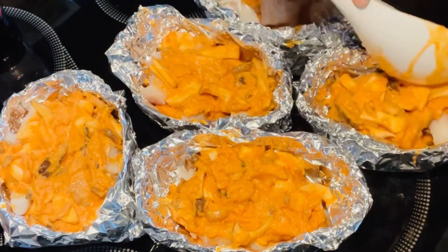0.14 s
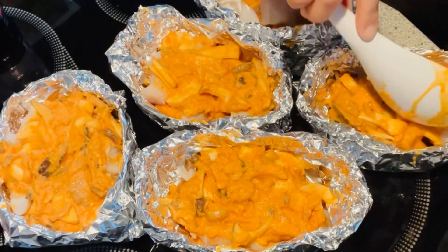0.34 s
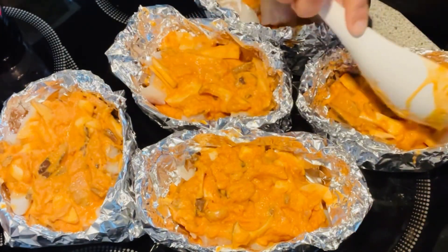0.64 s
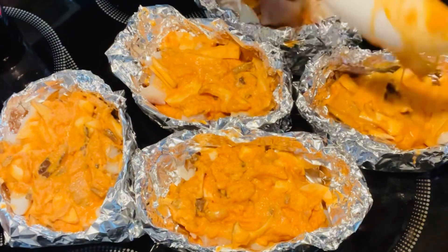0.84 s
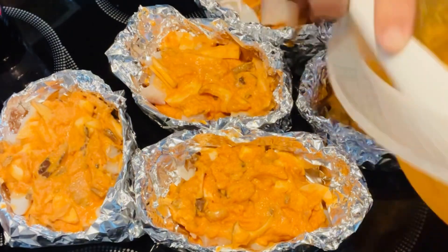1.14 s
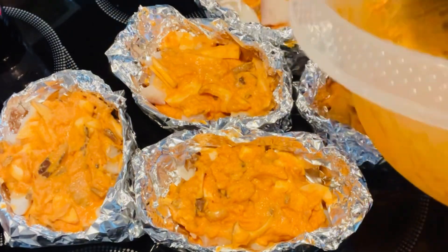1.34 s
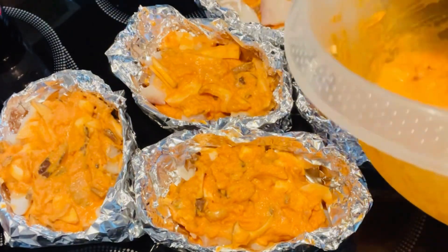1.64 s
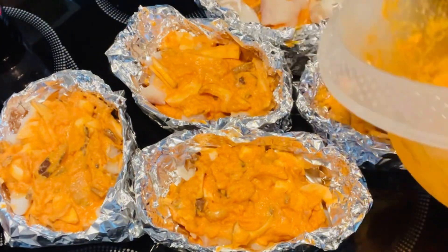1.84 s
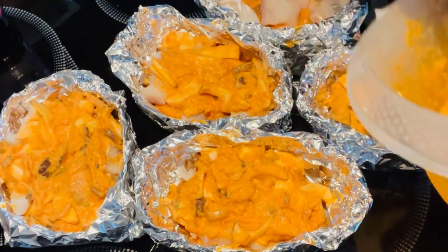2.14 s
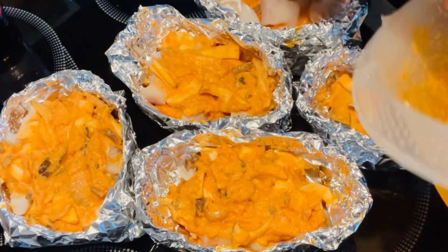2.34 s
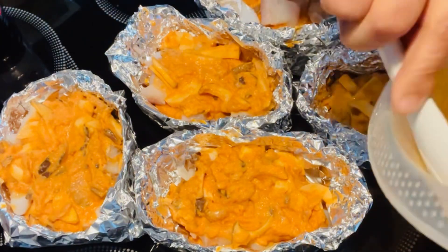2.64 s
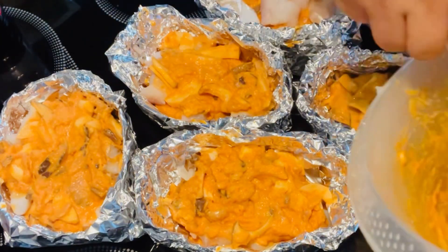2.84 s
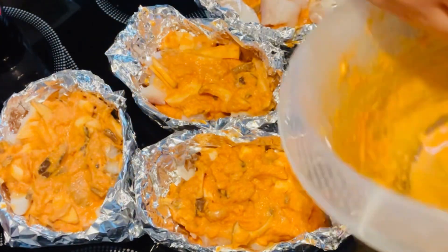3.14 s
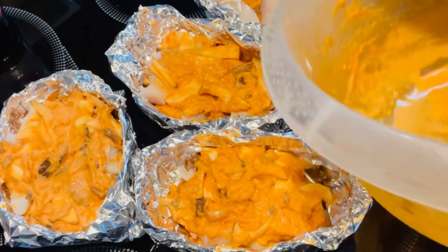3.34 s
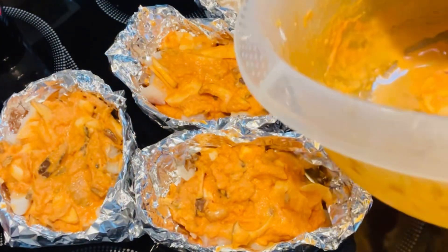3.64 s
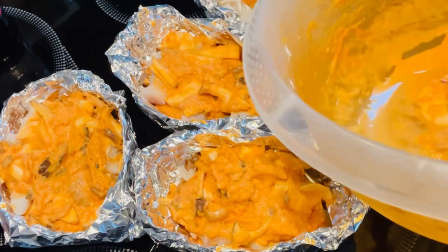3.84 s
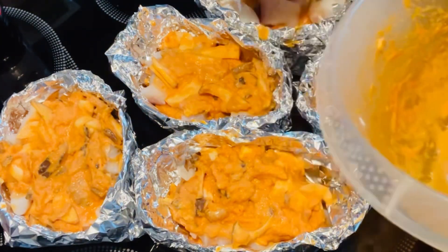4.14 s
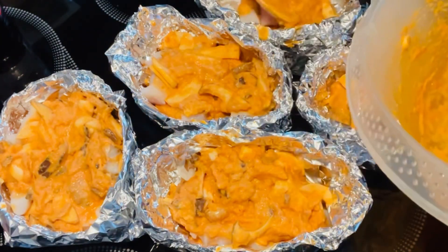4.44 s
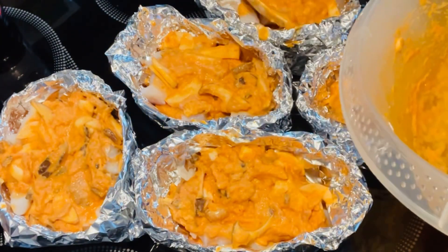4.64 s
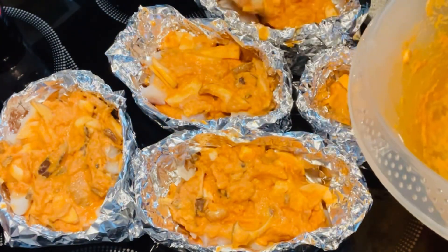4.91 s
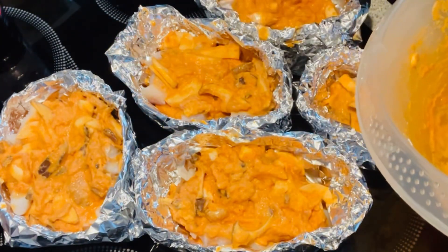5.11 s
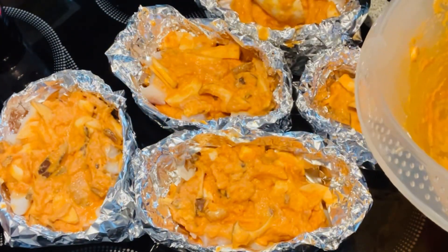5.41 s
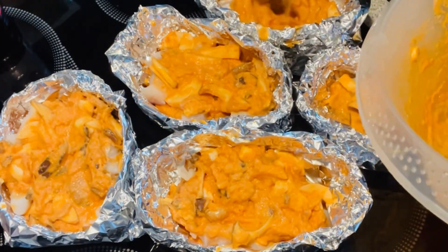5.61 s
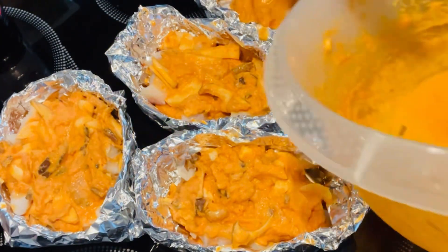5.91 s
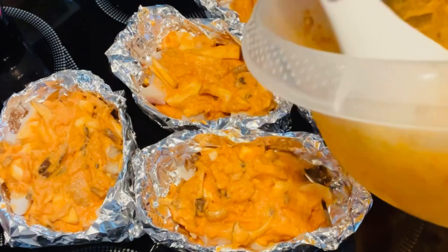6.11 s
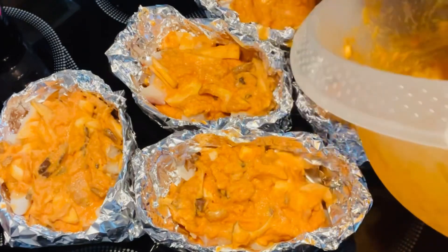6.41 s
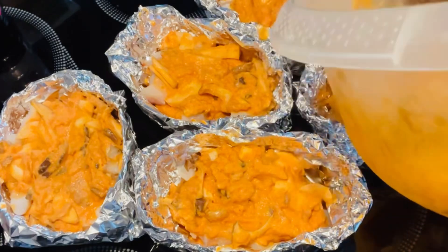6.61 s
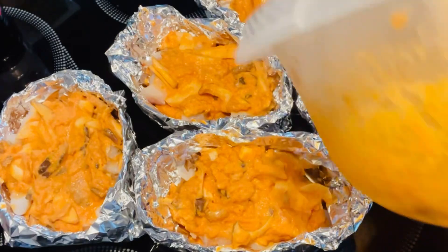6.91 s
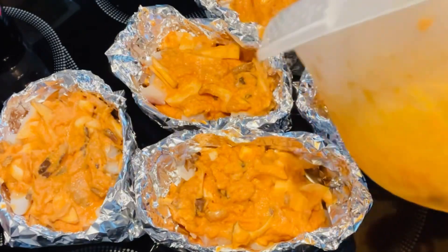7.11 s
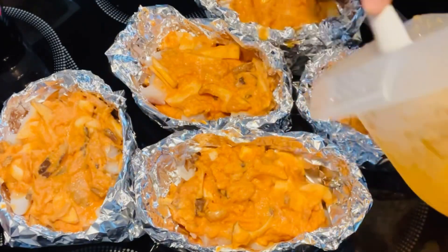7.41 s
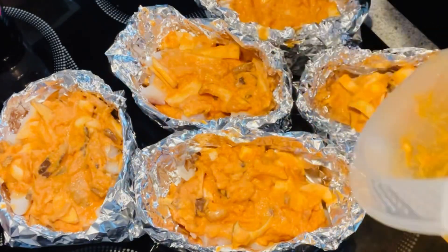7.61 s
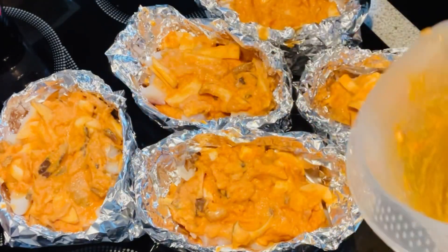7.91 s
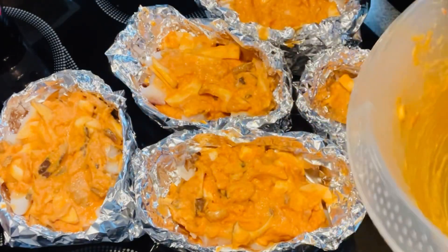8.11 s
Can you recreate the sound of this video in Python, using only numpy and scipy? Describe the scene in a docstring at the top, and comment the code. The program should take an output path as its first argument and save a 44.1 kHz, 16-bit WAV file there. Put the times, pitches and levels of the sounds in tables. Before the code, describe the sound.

A plastic spoon scoops thick sauce from a plastic bowl into foil cups, heard close in a small kitchen over a faint low appliance hum and soft hiss. The first second holds only light ticks and a faint scrape. At 1.2 seconds a dull thump comes with sharp foil snaps. Soft scrapes, short sauce plops and hollow bowl knocks follow until about 3.1 seconds, with strong hits at 2.0 and 2.4 and the loudest ringing knock at 2.7. A lull follows, with sparse small foil ticks near 4.1 and 5.3 seconds. At 6.1 a sharp snap and a thump restart the work, followed by more scrapes and plops. The bowl is knocked firmly at 7.0 and thumps heavily at 7.3. A soft scrape with a couple of crisp snaps runs until about 7.9, then fades into the hum.

```python
"""A small kitchen: a plastic spoon scoops thick sauce from a plastic mixing bowl into foil cups.
The spoon knocks the loaded bowl, which rings and thumps, and scrapes along it in tiny slips.
The sauce plops; sauce films break and foil creases flip with a tick. The room adds a short tail.
Underneath, an appliance hums with a slow beat over soft room noise."""
import sys
import numpy as np
from scipy import signal
from scipy.fft import rfft, irfft, next_fast_len
from scipy.io import wavfile
from scipy.ndimage import uniform_filter1d

SR = 44100
rng = np.random.default_rng(int(sys.argv[2]) if len(sys.argv) > 2 else 0)


def master(y):
    """Save y as 16-bit WAV."""
    cut = np.clip(np.atleast_2d(y).T, -1, 1)
    pcm = np.round(cut * 32767)  # scale
    wavfile.write(sys.argv[1], SR, pcm.astype(np.int16))


N = 364266
TIME_S = np.arange(N) / SR
AGE_S = TIME_S[:SR // 2]   # since contact


def from_db(db):
    """Decibels to gain."""
    return np.exp(np.asarray(db) * (np.log(10) / 20))


def unit_rms(x):
    """Scale to rms 1."""
    return x / np.sqrt(np.mean(x ** 2) + 1e-20)


def decay(t60_s):
    """Exponential decay from contact."""
    return np.exp(-np.log(1000) * AGE_S / max(t60_s, 1e-3))


def at_hz(points, hz):
    """Table lookup on a log-frequency axis."""
    freq_hz, value = np.transpose(points)
    return np.interp(np.log(np.maximum(hz, 1)), np.log(freq_hz), value)


def coloured(x, spectrum):
    """Spectral shaping; rms 1."""
    size = next_fast_len(len(x))
    gain = from_db(at_hz(spectrum, np.arange(size // 2 + 1) * SR / size))
    return unit_rms(irfft(rfft(x, size) * gain, size)[:len(x)])


def butter(x, hz, kind="low", order=2):
    """Butterworth filter."""
    return signal.sosfilt(signal.butter(order, np.clip(hz, 10, SR / 2.1), kind, fs=SR, output="sos"), x)


def drift(rate_hz):
    """Random wander, spread about 1."""
    knots = rng.standard_normal(int(N / SR * rate_hz) + 2)
    return np.interp(TIME_S * rate_hz, np.arange(len(knots)), knots)


def add(out, start_s, sound):
    """Mix in at start_s."""
    i = max(round(start_s * SR), 0)
    out[i:i + len(sound)] += sound[:max(N - i, 0)]


def burst(spectrum, top_hz, t60_s, shiver_db, shiver_t60_s):
    """Contact noise: fast crack, weaker shiver."""
    noise = unit_rms(butter(coloured(rng.standard_normal(len(AGE_S)), spectrum), top_hz))
    return noise * (decay(t60_s) + from_db(shiver_db) * decay(shiver_t60_s))


def sagging_tone(hz, t60_s, sag, settle_s, rise_s):
    """A soft body swells into vibration, starts sharp and settles to pitch."""
    pitch_hz = hz * (1 + sag * np.exp(-AGE_S / settle_s))
    attack = 1 - np.exp(-(AGE_S / rise_s) ** 2)
    return np.sin(2 * np.pi * np.cumsum(pitch_hz) / SR) * decay(t60_s) * attack


# air hiss spectrum: freq_hz, gain_db
AIR_SPECTRUM = [(60, -13.5), (130, -4), (300, -7), (700, -17.5), (1900, -15), (2600, -12), (3200, -5),
                (5300, -8), (6500, -13), (8400, -14.5), (10000, -24.5), (16000, -27)]
# low wash spectrum: freq_hz, gain_db
WASH_SPECTRUM = [(100, -2.5), (170, -5.5), (250, -4), (298, 0.5), (335, -3.5), (500, -8.5), (600, -6.5),
                 (720, -14), (1100, -13), (2000, -35.5), (8000, -59)]
# low wash envelope: time_s, level_db
WASH_LEVELS = [(0, -68.5), (1.1, -63.5), (3.5, -62.5), (3.8, -76.5), (4.6, -67), (5.3, -70), (6, -66),
               (8.26, -63.5)]


def room_noise(air_db=-66, flutter_db=1.5, rumble_db=-69):
    """Soft hiss of air, low rumble and a swelling wash."""
    air = from_db(air_db + flutter_db * drift(6.4)) * coloured(rng.standard_normal(N), AIR_SPECTRUM)
    rumble = from_db(rumble_db) * unit_rms(butter(rng.standard_normal(N), [60, 150], "band"))
    wash_db = np.interp(TIME_S, *np.transpose(WASH_LEVELS))
    wash = from_db(wash_db) * coloured(rng.standard_normal(N), WASH_SPECTRUM)
    return air + rumble + wash


# low appliance hum, then two faint room tones: pitch_hz, rms_db
STEADY_TONES = [(48.6, -78), (51.3, -57), (100, -69), (103, -77), (135, -78.5), (153, -73), (295, -83),
                (606, -87.5)]


def hum_and_room_tones(waver_rad_at_50hz=0.15, throb_db=2.0):
    """Low appliance hum, its lowest pair beating, and two faint room tones; all waver."""
    out = 0
    for pitch_hz, rms_db in STEADY_TONES:
        phase = 2 * np.pi * pitch_hz * TIME_S + waver_rad_at_50hz * pitch_hz / 50 * drift(3.9)
        out += from_db(rms_db + throb_db * drift(7.2)) * np.sqrt(2) * np.sin(phase)
    return out


# room tail spectrum: freq_hz, gain_db
TAIL_SPECTRUM = [(60, -14.5), (250, -10), (550, -7.5), (900, -11.5), (1800, -9), (4500, -9), (14000, -6)]
# room tail decay: freq_hz, t60_s
TAIL_DECAY = [(100, 0.66), (250, 0.19), (500, 0.17), (2000, 0.36), (6000, 0.18), (14000, 0.216)]


def kitchen_reverb(x, rise_s=0.0045):
    """Diffuse reflections build fast and die band by band."""
    tail, edges_hz = 0, np.geomspace(30, 21000, 12)
    for low_hz, high_hz in zip(edges_hz, edges_hz[1:]):
        band = butter(rng.standard_normal(len(AGE_S)), [low_hz, high_hz], "band")
        tail += band * decay(at_hz(TAIL_DECAY, np.sqrt(low_hz * high_hz)))
    response = rfft(tail * (1 - np.exp(-(AGE_S / rise_s) ** 2)), SR)   # 1 Hz bins
    flat = response / np.sqrt(uniform_filter1d(np.abs(response) ** 2, size=45) + 1e-3)
    gain = from_db(at_hz(TAIL_SPECTRUM, np.arange(len(flat))))
    impulse = irfft(flat * gain, SR)[:len(AGE_S)]
    return signal.fftconvolve(x, impulse)[:N]


def sauce_resonances(x, spread_db=3.0, rate_hz=100, bands=12):
    """Shifting sauce lifts and drops each band independently; rms 1."""
    out, edges_hz = 0, np.geomspace(250, 16500, bands + 1)
    for band_hz in zip(edges_hz, edges_hz[1:]):
        out += butter(x, band_hz, "band") * from_db(spread_db * np.clip(drift(rate_hz), -2, 2))
    return unit_rms(out + butter(x, edges_hz[0]))


def drag_db(time_s, start_s, level_db, ease_db_per_s=5.5):
    """Stroke level: pressure eases as the spoon fills."""
    return level_db - ease_db_per_s * (time_s - start_s)


# friction spectrum: freq_hz, gain_db
SCRAPE_SPECTRUM = [(100, -0.5), (300, -4), (550, 1.5), (820, -4), (1200, -0.5), (1700, 1), (2600, -2.5),
                   (4700, -0.5), (7000, -3.5), (9000, -5), (16000, 4)]
# drags through sauce or over foil: start_s, end_s, level_db, top_hz
SPOON_STROKES = [(0.224, 0.367, -58, 7100), (1.059, 1.22, -59.5, 2060), (1.335, 1.417, -47.5, 7500),
                 (1.41, 1.513, -50, 1060), (1.70, 1.876, -47, 7150), (2.08, 2.233, -45.5, 6500),
                 (2.297, 2.317, -43.5, 5700), (2.435, 2.486, -41, 4550), (2.698, 3.072, -47, 6400),
                 (3.245, 3.30, -61, 6020), (5.305, 5.39, -59, 8000), (6.171, 6.383, -51, 6920),
                 (6.271, 6.336, -48, 960), (6.584, 6.812, -47.5, 7100), (7.017, 7.147, -45, 5540),
                 (7.395, 7.945, -48, 6200), (7.992, 8.257, -66, 4980)]


def scrapes(slips_per_s=1500, size_db=2.5, judder_db=2.0, edge_s=0.023, smear=0.54):
    """Spoon on wet plastic: dense tiny slips under an unsteady hand."""
    sizes = from_db(size_db * np.minimum(rng.exponential(1, N), 4)) * rng.choice([-1, 1], N)
    slips = unit_rms(sizes * (rng.random(N) < slips_per_s / SR)) + smear * rng.standard_normal(N)
    friction = coloured(sauce_resonances(slips), SCRAPE_SPECTRUM) * from_db(judder_db * drift(60))
    out = np.zeros(N)
    for start_s, end_s, level_db, top_hz in SPOON_STROKES:
        span = (TIME_S > start_s - edge_s) & (TIME_S < end_s + edge_s)
        time_s = TIME_S[span]
        touch = np.clip(np.minimum(time_s - start_s, end_s - time_s) / edge_s + .5, 0, 1)
        pressure = from_db(drag_db(time_s, start_s, level_db))
        out[span] += unit_rms(butter(friction[span], top_hz)) * touch * pressure
    return out


def random_ticks(idle_per_s=3, idle_db=-61, drag_per_s=26, over_drag_db=1.5, spread_db=4, top_hz=9450):
    """Rows of lesser snaps: sparse as foil settles, dense under the dragging spoon."""
    ticks = [(at_s, idle_db) for at_s in rng.uniform(0, N / SR, int(idle_per_s * N / SR))]
    for start_s, end_s, level_db, _ in SPOON_STROKES:
        times_s = rng.uniform(start_s, end_s, round(drag_per_s * (end_s - start_s)))
        ticks += [(at_s, drag_db(at_s, start_s, level_db) + over_drag_db) for at_s in times_s]
    return [(at_s, db + spread_db * rng.standard_normal(), top_hz) for at_s, db in ticks]


# snap spectrum: freq_hz, gain_db
SNAP_SPECTRUM = [(200, -19.5), (600, -10), (900, -11), (1400, 1), (2100, -5), (3100, -1.5), (4500, -0.5),
                 (7000, -1.5), (9000, -4.5), (12000, -4), (16000, -1)]
# prominent foil and sauce snaps: start_s, level_db, top_hz
MAIN_SNAPS = [(.299, -45, 11000), (0.5953, -43, 15000), (1.214, -25.5, 18900), (1.2371, -26.5, 19300),
              (1.2435, -29.5, 16000), (1.3472, -28.5, 2820), (1.7490, -29.5, 8200), (1.859, -30.5, 4430),
              (2.2080, -32.5, 3830), (2.477, -35.5, 5922), (2.8652, -42, 6000), (2.9397, -32.5, 5700),
              (3.1115, -40.5, 3430), (4.0613, -41, 10100), (4.648, -54.5, 11000), (5.1163, -47.5, 11900),
              (5.321, -36, 13000), (5.367, -42.5, 5500), (5.455, -55, 2000), (5.623, -52.5, 3500),
              (6.1077, -25.5, 18960), (6.396, -42, 2000), (6.5729, -44.5, 6800), (6.7194, -35.5, 7000),
              (7.4800, -27.5, 12900), (7.8378, -32, 4760)]


def snaps(ring_db=-5, ring_t60_s=0.015):
    """Foil creases flip and sauce films break, each ringing briefly at four pitches."""
    out = np.zeros(N)
    for start_s, level_db, top_hz in MAIN_SNAPS + random_ticks():
        pitches_hz = np.geomspace(1300, 6500, 4) * 2 ** rng.uniform(-.3, .3, 4)
        ring = sum(np.sin(2 * np.pi * hz * AGE_S) for hz in pitches_hz) / 2 * decay(ring_t60_s)
        crack = burst(SNAP_SPECTRUM, top_hz, t60_s=0.026, shiver_db=-22, shiver_t60_s=.07)
        add(out, start_s, from_db(level_db) * (crack + from_db(ring_db) * butter(ring, top_hz)))
    return out


# sauce plops and low thumps of the knocked bowl: start_s, level_db, pitch_hz, t60_s
PLOPS_AND_THUMPS = [(1.216, -18, 147, 0.077), (1.858, -32, 555, 0.036), (2.046, -33.5, 401, 0.35),
                    (2.124, -19.5, 273, 0.03), (2.206, -26, 537, 0.055), (2.239, -23.5, 270, 0.027),
                    (2.3886, -13.5, 225, .024), (2.467, -18.5, 518, .018), (3.110, -20.5, 330, 0.0092),
                    (6.112, -22, 183, 0.052), (6.351, -23.5, 510, 0.031), (6.3515, -21.5, 228, 0.075),
                    (6.579, -26.5, 193, 0.054), (6.767, -30, 209, .073), (7.015, -19.5, 374.6, 0.21),
                    (7.335, -12, 189.6, 0.062), (7.340, -12, 340, 0.045), (8.111, -45, 524, 0.089)]


def plops_and_thumps(noise_db=-10):
    """Sauce plops and the loaded bowl thumps under the spoon: a falling tone plus dull noise."""
    out = np.zeros(N)
    for start_s, level_db, pitch_hz, t60_s in PLOPS_AND_THUMPS:
        band = butter(rng.standard_normal(len(AGE_S)), [pitch_hz * 0.37, pitch_hz * 2.0], "band")
        noise = unit_rms(band) * decay(t60_s * 1.1)
        tone = sagging_tone(pitch_hz, t60_s, sag=1.0, settle_s=0.0014, rise_s=0.0015)
        add(out, start_s, from_db(level_db) * (tone + from_db(noise_db) * noise))
    return out


# dense small modes, blurred by sauce: freq_hz, gain_db
BLUR_SPECTRUM = [(100, -18.5), (300, 1), (560, 0.5), (850, -9), (1700, -8), (3000, -17.5), (6000, -28.5),
                 (14000, -38.5)]
# loaded wall modes: pitch_hz, level_db, t60_s
WALL_MODES = [(172, -24, 0.19), (258.7, -14, 0.12), (330, -13.5, 0.094), (382, -14.5, 0.15),
              (449.8, -9.5, 0.039), (538.2, -1, 0.048), (610.5, -5, 0.042), (724, -12, 0.04),
              (950, -13.5, 0.038), (1097, -12.5, 0.056), (1535, -14, 0.022), (1682, -15.5, 0.06),
              (2036, -17, 0.033), (2770, -23.5, 0.016), (3366, -25.5, .035)]


def bowl_wall(tuning, lag_s_at_500hz=.0016, spread_db=0.66, blur_db=-20, blur_t60_s=0.15):
    """Bending waves in the wall; low modes arrive after high ones."""
    out = from_db(blur_db) * coloured(rng.standard_normal(len(AGE_S)), BLUR_SPECTRUM) * decay(blur_t60_s)
    for k, (pitch_hz, level_db, t60_s) in enumerate(WALL_MODES):
        mode = np.sin(2 * np.pi * pitch_hz * tuning * AGE_S) * decay(t60_s)
        lag_s = lag_s_at_500hz * np.sqrt(500 / pitch_hz)
        gain = (-1) ** k * from_db(level_db + spread_db * rng.standard_normal())
        out += gain * np.interp(AGE_S - lag_s, AGE_S, mode, left=0)
    return out


# impact spectrum: freq_hz, gain_db
CRACK_SPECTRUM = [(300, -4), (620, -2.5), (850, -8.5), (1400, 1), (2200, -3), (3500, -0.5), (5000, -1),
                  (7000, -9), (9000, -16), (16000, -10.5)]
# spoon on bowl: start_s, ring_db, crack_db, crack_top_hz, boom_db, lead_hz, lead_db
SPOON_KNOCKS = [(1.2142, -24.5, -25, 4700, -24, 1490, -20.5), (1.641, -27, -20.5, 4260, -21, 1390, -31),
                (2.0400, -13, -18, 5360, -30, 1223, -17.5), (2.6608, -4.5, -17.5, 4230, -27, 1680, -19),
                (3.0196, -29.5, -28, 4610, -46.5, 1072, -25), (6.1079, -28, -30.5, 5770, -27.5, 1450, -36),
                (6.1718, -39.5, -28.5, 5870, -44, 1384, -27), (6.7645, -29.5, -30, 3800, -50.5, 1445, -25),
                (7.0074, -12.5, -23, 1470, -39, 1390, -11.5), (7.1110, -23.5, -31.5, 2050, -53, 683, -25.5),
                (7.3327, -19.5, -13.5, 4600, -19, 1690, -13)]


def knocks(grip_detune=0.015):
    """Each blow cracks, rings the wall and booms the bowl; the struck spot favours one lead mode."""
    out = np.zeros(N)
    boom = sagging_tone(hz=106.0, t60_s=0.2, sag=0.063, settle_s=0.0074, rise_s=0.0062)
    for start_s, ring_db, crack_db, crack_top_hz, boom_db, lead_hz, lead_db in SPOON_KNOCKS:
        ring = bowl_wall(tuning=1 + grip_detune * rng.uniform(-0.9, 1))
        crack = burst(CRACK_SPECTRUM, crack_top_hz, t60_s=0.03, shiver_db=-23, shiver_t60_s=0.067)
        lead = sagging_tone(lead_hz, t60_s=0.03, sag=0.036, settle_s=0.0077, rise_s=0.001)
        body = from_db(ring_db) * ring + from_db(boom_db) * boom + from_db(lead_db) * lead
        add(out, start_s, body + from_db(crack_db) * crack)
    return out


def scene():
    """Spoon work, its reverb and the background; mono."""
    spoon = knocks() + plops_and_thumps() + snaps() + scrapes()
    return (spoon + kitchen_reverb(spoon) + hum_and_room_tones() + room_noise())[None]


def record(dry, low_hz=47, top_hz=16000):
    """Microphone band limits: deepest bass and top cut steeply."""
    thinned = butter(dry, low_hz, "high", order=8)
    return signal.sosfilt(signal.ellip(10, .1, 80, top_hz, fs=SR, output="sos"), thinned)


dry = scene()
out = record(dry)
master(out)
```